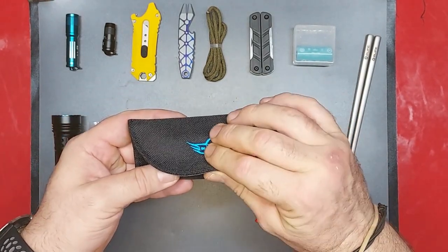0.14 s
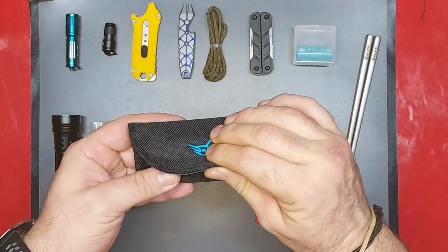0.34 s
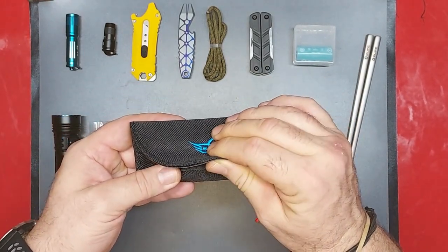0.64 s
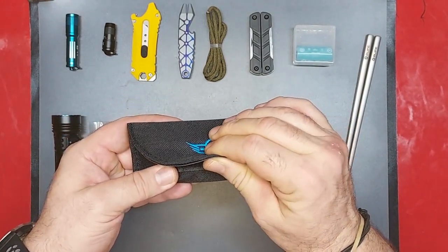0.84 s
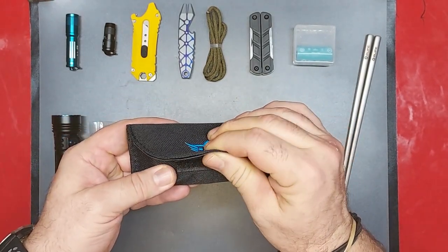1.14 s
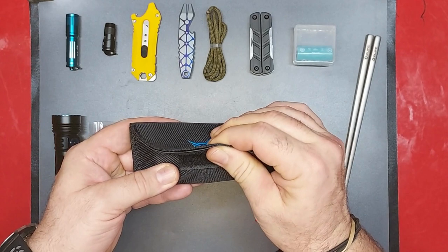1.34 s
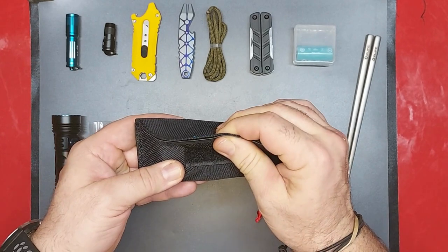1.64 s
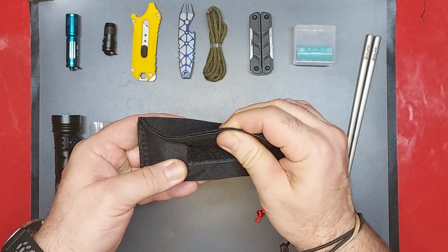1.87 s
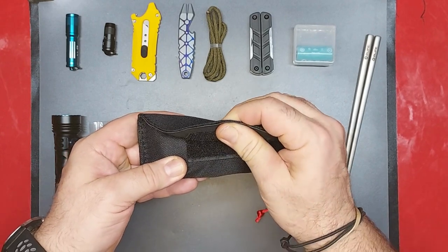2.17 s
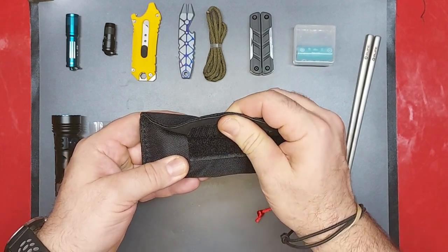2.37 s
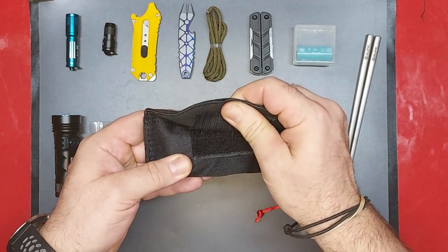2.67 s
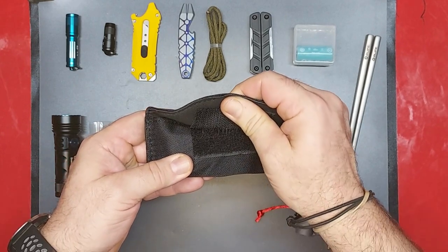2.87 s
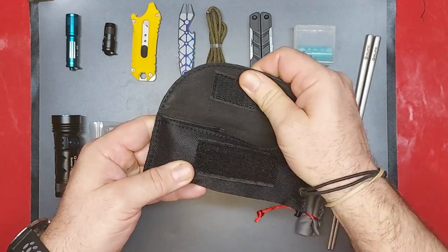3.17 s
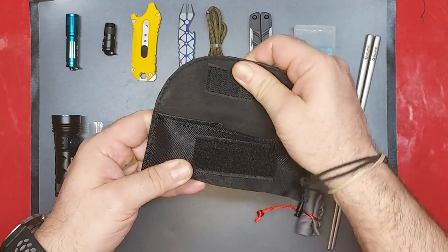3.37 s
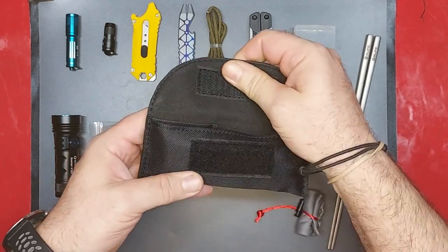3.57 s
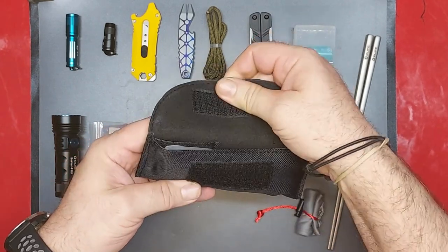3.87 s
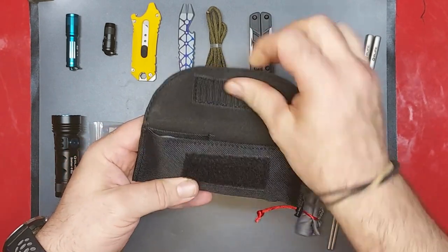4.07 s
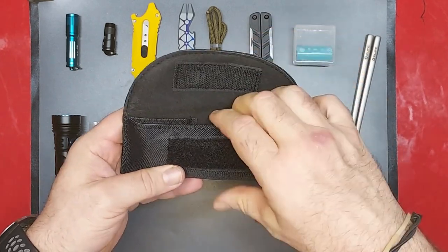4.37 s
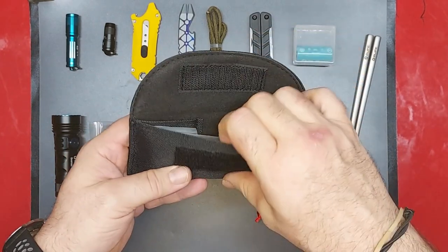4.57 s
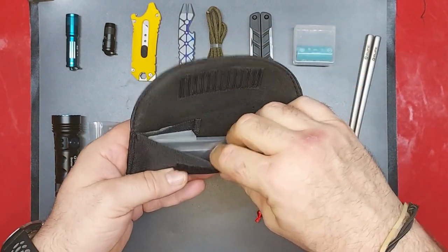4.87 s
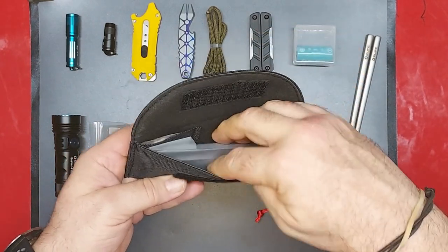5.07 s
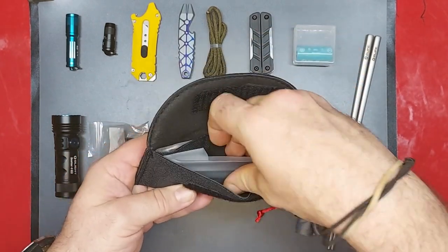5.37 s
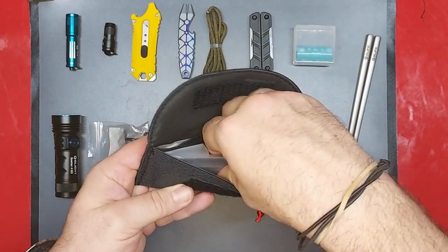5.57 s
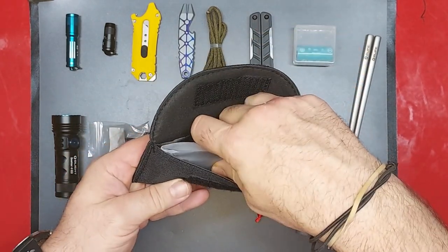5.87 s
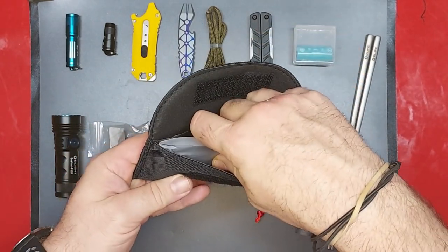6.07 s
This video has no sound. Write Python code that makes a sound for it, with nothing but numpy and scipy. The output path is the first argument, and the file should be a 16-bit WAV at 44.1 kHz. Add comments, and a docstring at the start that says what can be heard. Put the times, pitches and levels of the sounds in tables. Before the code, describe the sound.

A hook-and-loop pouch flap is peeled open slowly with crackling, ragged rips, then fingers rustle and scuff softly inside the nylon in a quiet room.

```python
"""Opening and searching a pouch

The hook-and-loop flap of a nylon pouch is peeled open over a workbench: clusters of clicks over running tears.
Then fingers slide over the cloth and push inside, with fine ticks, a dull scuff and soft squeaks.
Random clicks shake filters for fibres, flap, pouch and hollow; echoes of bench and small room, then faint air."""
import sys
import numpy as np
from scipy import signal
from scipy.fft import rfft, irfft
from scipy.io import wavfile
from scipy.ndimage import uniform_filter1d

SR = 44100
rng = np.random.default_rng(int(sys.argv[2]) if len(sys.argv) > 2 else 0)


def materialize(psi):
    """Save the field psi as 16-bit PCM at rate SR to the path in sys.argv[1].

    A 1-D psi becomes a single channel; in a 2-D psi each row is a channel.
    """
    bounded = np.clip(np.atleast_2d(psi).T, -1, 1)
    quanta = np.round(bounded * 32767).astype(np.int16)
    wavfile.write(sys.argv[1], SR, quanta)


N = 274733

# All table levels are relative: the functions below mix and filter the parts.
# "give" is the flap's answer relative to the snap: small while the cloth is taut, larger as it loosens.
# the loudest clusters of hooks letting go: (t/s, snap level/dB, give/dB, ring of the cloth f/Hz)
HOOK_CLUSTERS = [(.211, -42, -12, 2000), (.2295, -37.5, -7, 4120), (.2452, -41, 2.5, 3000),
                 (.3408, -31.5, -10, 4300), (.3501, -42, -13, 4060), (.4095, -34, -7.5, 4500),
                 (.4869, -38, -22, 4500), (.6465, -46, -19, 2900), (.7517, -32, -16, 4320),
                 (.7802, -32, -5.5, 3150), (.8243, -29, -8, 1490), (.8553, -31, -16, 1350),
                 (.8735, -24, -13, 4170), (.881, -29.5, -6.5, 1350), (.9118, -23, -11.5, 3380),
                 (.9539, -34.5, -13.5, 1660), (1.037, -37, -21, 3500), (1.0415, -19.5, -16.5, 3700),
                 (1.1154, -35, -19, 4500), (1.1528, -27.5, -19, 4030), (1.189, -29.5, -4.5, 1700),
                 (1.2191, -26.5, -11, 4100), (1.229, -21.5, -15, 1200), (1.2414, -22, -9, 1870),
                 (1.2637, -22.5, -6, 4050), (1.301, -19.5, -12.5, 3060), (1.3161, -32, -0.5, 1670),
                 (1.3365, -29, -1.5, 1840), (1.348, -20, -12.5, 3500), (1.3572, -34.5, -6, 1830),
                 (1.3877, -34.5, -7, 1640), (1.4198, -29.5, -13, 2960), (1.4326, -28.5, -2.5, 3050),
                 (1.4725, -23.5, -15, 4330), (1.481, -17.5, -10.5, 4530), (1.4986, -21, -12, 1680),
                 (1.5311, -24.5, -10, 1623), (1.5404, -24, -8.5, 2840), (1.5825, -21, -17, 2070),
                 (1.5937, -23, -3.5, 2200), (1.602, -16, -24, 1660), (1.6449, -25.5, -12.5, 1650),
                 (1.6643, -23.5, -17, 1700), (1.709, -25.5, -17, 4370), (1.7664, -35, -16.5, 4180),
                 (1.7844, -27.5, -8, 2970), (1.7957, -27, -8.5, 3030), (1.8383, -23, -11, 1730),
                 (1.8854, -21, -14, 2900), (1.921, -22, -12, 1800), (1.9458, -31, -7.5, 3060),
                 (2.0219, -29.5, -22.5, 4180), (2.0844, -32.5, -18.5, 3330), (2.1422, -29, -15.5, 3440),
                 (2.1471, -15.5, -17, 3530), (2.1772, -28.5, -10.5, 1970), (2.2166, -24.5, -13, 1960),
                 (2.2427, -20.5, -15.5, 3150), (2.284, -21, -7.5, 1880), (2.2907, -12.5, -9.5, 3580),
                 (2.3181, -23, -9, 1800), (2.4567, -24, 0, 2070), (2.5062, -21, -5.5, 1970),
                 (2.6101, -41, -5, 1970), (2.6327, -32, -11.5, 1950), (2.644, -30.5, -7, 2070),
                 (2.6887, -17.5, -12, 1250), (2.7154, -20.5, -4, 1860), (2.757, -25, -3.5, 2060),
                 (2.817, -34, -7.5, 2000), (2.8426, -36.5, -4, 1940), (2.8512, -26.5, -15.5, 1900),
                 (2.8726, -31.5, -10.5, 4300), (2.9002, -31.5, -7, 1940), (2.9414, -36, -7, 3580),
                 (2.9557, -28, -11.5, 1750), (3.03, -34.5, 4, 1300), (3.0494, -29.5, 7, 2050),
                 (3.0636, -19.5, -3, 2030), (3.0884, -30.5, 11.5, 1970)]
# pulls that keep the strip tearing: (start t/s, length t/s, snap level/dB, swell start to end/dB, give/dB)
TEARING_PULLS = [(.78, 0.22, -52.5, -12.5, -4.5), (1.21, 0.16, -36.5, -8, -10),
                 (1.478, 0.14, -37, 0.5, -13.5), (1.79, 0.12, -37, -1, -6.5),
                 (2.203, 0.056, -31.5, -4, -7.5), (2.283, .06, -26, -6, -5), (2.35, .06, -32, 0.5, -3.5),
                 (2.415, 0.018, -23.5, 4, -9), (2.44, 0.064, -22.5, -4.5, -5),
                 (2.515, 0.015, -32.5, -11, -8.5), (2.64, 0.062, -37.5, 14, -3),
                 (2.688, 0.093, -29.5, -5.5, -5), (2.83, 0.065, -50.5, 2, -6), (2.995, 0.03, -27, 4, -2.5),
                 (3.024, .08, -27, -2, -1.5)]
# creases and seams flicking past the fingers: (t/s, snap level/dB, give/dB, ring of the cloth f/Hz)
CREASE_FLICKS = [(.0445, -56, -2.5, 1700), (.118, -48.5, -5.5, 3000), (.1375, -45, -11.5, 4000),
                 (3.7897, -44, -16.5, 1940), (4.0527, -41, -32, 4380), (4.155, -38, -19, 3630),
                 (4.5837, -56.5, 2.5, 1970), (4.7213, -41, -8.5, 3500), (4.7357, -44.5, 3.5, 3300),
                 (4.8296, -48.5, -4, 1790), (4.9699, -43, 1, 1940), (5.0758, -43.5, 0.5, 1960),
                 (5.2755, -40.5, -9.5, 1900), (5.7743, -43.5, -25, 2520), (6.1917, -48, -3.5, 3900)]
# strokes of the fingers over the cloth: (start t/s, length t/s, hiss level/dB, swell start to end/dB, give/dB)
FINGER_STROKES = [(.02, 0.15, -61.5, 7, -4), (.24, .06, -55, -4, -10), (.49, .21, -66, -7, -8.5),
                  (3.375, 0.025, -66, -5, -10), (3.42, .04, -70, 5, -13), (3.47, 0.16, -62, -10.5, -11.5),
                  (3.7, .025, -58.5, -9, -11.5), (3.93, 0.15, -57, 6, -9.5),
                  (4.057, 0.028, -49, -4.5, -12.5), (4.1, 0.042, -57.5, 0.5, -9),
                  (4.3, 0.057, -62, 2.5, -3), (4.43, 0.19, -65, -3.5, -6), (4.57, 0.3, -58.5, 5, -4),
                  (4.9, 0.097, -55, 5, 1), (5.02, 0.11, -57, -2, -3.5), (5.17, 0.084, -61, 2.5, 3),
                  (5.26, 0.14, -59.5, -9, -2), (5.37, 0.13, -60, -3, -7.5), (5.48, 0.045, -53, 4, -1),
                  (5.67, .13, -62, 7, -5.5), (5.82, 0.14, -57.5, -7, 0.5), (6.2, .03, -64, -1, 3)]
# how freely the whole pouch moves with the flap: (t/s, pouch minus flap level/dB)
POUCH_SLACK = [(0, -10), (1.0, -22.5), (2.0, -13), (2.8, -11), (3.101, -7), (4.1, -9.5), (4.7, -26),
               (5.2, -14), (6.2, -42)]
# colour of the bright hook clicks: (f/Hz, level/dB)
HOOK_COLOUR = [(1500, -41.5), (3000, -4.5), (4000, -7.5), (5500, -3), (7000, -6), (8500, -10),
               (10500, -3.5), (12500, -2), (16000, -5)]
# colour of the flap, in the middle range: (f/Hz, level/dB)
FLAP_COLOUR = [(400, -41), (800, -1.5), (1150, 0.5), (1800, 6), (2300, 5), (3000, 5), (4000, 4.5),
               (6000, -26.5), (12000, -47.5)]
# colour of the pouch body, below the flap: (f/Hz, level/dB)
POUCH_COLOUR = [(60, -23), (150, -14), (280, -7.5), (380, -1), (650, 2.5), (900, 2), (1400, -17.5),
                (4000, -44)]
# resonances of the bench and the things on it: (f/Hz, width f/Hz, level/dB)
BENCH_MODES = [(644, 59, 1), (745, 54, -1.5), (885, 39, 4), (1044, 110, -4), (1148, 86, 5.5),
               (1310, 140, 4), (1477, 120, -4.5), (1660, 100, 4), (1926, 130, 5.5), (2044, 61, -8.5),
               (2460, 84, 3.5), (3503, 150, 3.5)]
# hollow between finger and wall: (f/Hz, width f/Hz, level/dB)
HOLLOW_MODES = [(397, 58, -5), (577, 150, 1)]
# fingertips squeaking softly over the lining: (middle t/s, fade time t/s, level/dB, centre f/Hz)
LINING_RUBS = [(4.344, 0.046, -68, 1240), (4.963, 0.16, -63.5, 1390), (5.26, 0.078, -66.5, 940),
               (5.866, 0.085, -69, 1060)]
# stereo width: (f/Hz, side minus mid level/dB)
STEREO_WIDTH = [(100, -9.5), (350, -8.5), (1000, -5.5), (2000, -5), (3500, -2.5), (5500, 2), (7500, -4),
                (11000, -15), (16000, -12.5)]
# stereo balance: (f/Hz, left minus right level/dB)
STEREO_LEAN = [(60, 5.5), (250, -1.5), (500, -1), (1000, -2.5), (2000, -0.5), (5500, 3), (8500, -2),
               (13000, 0.4)]
# stereo timing: (f/Hz, phase by which the left port leads/rad)
STEREO_LEAD = [(100, 0), (800, -0.4), (1700, -.15), (2500, -0.54), (5000, -0.69), (7500, -0.13)]
# colour of the room air: (f/Hz, level/dB)
AIR_COLOUR = [(15, -31), (25, 3), (80, 6.5), (439, -12.5), (607, -14), (1040, -23), (1890, -16),
              (2110, -19), (2480, -20.5), (5730, -21), (8590, -21), (13600, -27.5), (16000, -17.5)]

AIR_DB = -69.5
TOP_HZ = 15900
PULL_ATTACK_S, PULL_RELEASE_S = 0.012, 0.0082
STROKE_ATTACK_S, STROKE_RELEASE_S = 0.023, 0.033
# hooks part faster under a harder pull: rate at a reference level, and dB of level per doubling of the rate
HOOKS_PER_S, HOOKS_AT_DB, DOUBLING_DB = 1500, -27.5, 7
# a finger dragging down the inner wall: moment of greatest pressure, its level, and the rise and fall around it
DRAG_S, DRAG_DB, DRAG_RISE_S, DRAG_FALL_S = 5.5, -44, 0.038, 0.031

# filter length and hop between changing echoes, both in samples
SIZE, HOP = 8192, 2048
FREQS = np.maximum(np.arange(SIZE // 2 + 1) * SR / SIZE, 1)
TIME = np.arange(N) / SR


def fastener(snap_db=-3, body_db=1.0, tear_db=-3):
    """Single clusters snap over running tears: stray hooks under a light pull, row after row under a hard one."""
    snaps = clusters(HOOK_CLUSTERS, lead=0.42, spread_s=0.0021, ring_width=290, ring_share=0.27, count=20)
    pull = gestures(TEARING_PULLS, PULL_ATTACK_S, PULL_RELEASE_S)
    pull_db = 20 * np.log10(pull[0] + 1e-9)
    rate = HOOKS_PER_S * 2 ** ((pull_db - HOOKS_AT_DB) / DOUBLING_DB)
    hooks = grains(per_second=rate, scatter_db=5.5, even_s=0.021)
    tears = pull * ragged(per_second=180, depth_db=1.5) * hooks
    return undb([[snap_db], [body_db]]) * snaps + undb(tear_db) * tears


def handling(slide_db=-3, crease_db=-3, body_db=2):
    """The weave ticks finely and unevenly under the skin, and a crease flicks now and then."""
    threads = grains(per_second=3000, scatter_db=3.5, even_s=0.03)
    ticks = ragged(per_second=65, depth_db=2.0) * threads
    weave = gestures(FINGER_STROKES, STROKE_ATTACK_S, STROKE_RELEASE_S) * ticks
    creases = clusters(CREASE_FLICKS, lead=0.67, spread_s=0.0019, ring_width=110, ring_share=0.073)
    return undb(slide_db) * weave + undb([[crease_db], [body_db]]) * creases


def pouch(snap, flap):
    """Fibres click brightly, the flap answers in the middle range and the slack pouch below it."""
    bench = bells(BENCH_MODES)
    body = flap * envelope(*np.transpose(POUCH_SLACK))
    parts = [(blurred(snap), HOOK_COLOUR), (flap, FLAP_COLOUR), (body, POUCH_COLOUR)]
    return sum(through(drive, unit(response(colour(points) + bench))) for drive, points in parts)


def finger_drag(scuff_db=-13, scuff_hz=1400, scuff_width=1100, cut_hz=270):
    """Skin sticks and slips on the lining, scuffs the cloth and rings the hollow inside the pouch."""
    hollow = sum(undb(db) * soft_ring(hz, width) for hz, width, db in HOLLOW_MODES)
    scuff = soft_ring(scuff_hz, scuff_width)
    side_s = np.where(TIME < DRAG_S, DRAG_RISE_S, DRAG_FALL_S)
    pressure = np.exp(-((TIME - DRAG_S) / side_s) ** 2)
    slips = undb(DRAG_DB) * pressure * grains(per_second=890, scatter_db=0.5, even_s=0.015)
    # the small hollow radiates no deep bass
    low_cut = signal.butter(2, cut_hz, "high", fs=SR, output="sos")
    return signal.sosfilt(low_cut, through(slips, unit(hollow) + undb(scuff_db) * scuff))


def rubs(width=260):
    """Quick stick and slip swells and fades in one narrow ring of the cloth."""
    slips = grains(per_second=900, scatter_db=14, even_s=0.09)
    total = np.zeros(N)
    for middle, fade_s, db, hz in LINING_RUBS:
        swell = np.exp(-((TIME - middle) / fade_s) ** 2)
        total += undb(db) * through(slips * swell, ring(hz, width))
    return total


def clusters(table, lead, spread_s, ring_width, ring_share, scatter_db=6, count=14):
    """One fibre lets go and its neighbours follow within milliseconds; gives the snap and flap drives."""
    drive = np.zeros((2, N + 2 * HOP))
    delays = rng.exponential(spread_s, (len(table), count))
    signs = rng.choice([-1, 1], delays.shape)
    sizes = undb(scatter_db * rng.standard_normal(delays.shape)) * signs
    # a longer cluster gets more energy, so its level does not thin out
    weight = np.sqrt((spread_s + 0.001) * SR)
    for (start, db, give_db, hz), delay, size in zip(table, delays, sizes):
        places = np.minimum(np.append(0, delay) * SR, HOP - 1).astype(int)
        pulses = np.bincount(places, np.append(lead, unit(size)), HOP)
        # the patch of cloth that springs back rings briefly
        recoil = pulses + ring_share * through(pulses, ring(hz, ring_width, size=512))
        pair = np.array([unit(pulses), undb(give_db) * unit(recoil)])
        i = int(start * SR)
        drive[:, i:i + HOP] += weight * undb(db) * pair
    return drive[:, :N]


def gestures(table, attack_s, release_s):
    """Each move of the hand sets in, swells or eases while it lasts, and dies away; gives snap and flap gains."""
    gains = np.zeros((2, N))
    for start, length, db, swell_db, give_db in table:
        along = np.clip((TIME - start) / length, 0, 1)
        attack = np.clip((TIME - start) / attack_s + 0.5, 0, 1)
        release = np.exp(-np.maximum(TIME - start - length, 0) / release_s)
        gain = attack * release * undb(db + swell_db * (along - 0.5))
        gains = np.maximum(gains, [gain, gain * undb(give_db)])
    return gains


def grains(per_second, scatter_db, even_s):
    """Random clicks of unequal size, their power held near one over stretches of even_s."""
    chosen = rng.random(N) < per_second / SR
    clicks = chosen * rng.choice([-1, 1], N) * undb(scatter_db * rng.standard_normal(N))
    power = uniform_filter1d(clicks ** 2, int(even_s * SR) + 1)
    return clicks / np.sqrt(np.abs(power) + 1e-6)


def ragged(per_second, depth_db):
    """A gain that jumps to a new random value many times a second."""
    return undb(depth_db * rng.standard_normal(N)[(TIME * per_second).astype(int)])


def blurred(clicks, share=0.36, length_s=0.0013):
    """Each click is mixed with a brief fading burst of noise, which blurs it slightly."""
    fade = unit(np.exp(-TIME[:HOP] / length_s)) ** 2
    fuzz = np.sqrt(np.abs(through(clicks ** 2, fade))) * rng.standard_normal(N)
    return np.sqrt(1 - share) * clicks + np.sqrt(share) * fuzz


def ring(hz, width, size=SIZE):
    """A struck resonance with an energy of one; the wider it is, the sooner it dies away."""
    return unit(np.exp(-np.pi * width * TIME[:size]) * np.sin(2 * np.pi * hz * TIME[:size]))


def soft_ring(hz, width):
    """A ring passed through itself, so that it builds up before it dies away."""
    return unit(through(ring(hz, width), ring(hz, width)))


def reflections(x, direct, early_t60=0.041, late_t60=0.16, late_db=-6, evenness=0.71):
    """Direct sound, quick bench scatter and a short room tail; the paths keep changing as the hands move."""
    count = N // HOP + 2
    padded = np.pad(x, (HOP, 2 * HOP))
    pieces = np.lib.stride_tricks.sliding_window_view(padded, 2 * HOP)[::HOP][:count]
    # t60 is the time in seconds to fall by 60 dB
    early, late = (unit(np.exp(-np.log(1000) * TIME[:SIZE] / t60)) for t60 in (early_t60, late_t60))
    decay = np.hypot(early, undb(late_db) * late)
    # a new random set of echoes for every piece
    paths = decay * rng.standard_normal((count, SIZE))
    paths[:, 0] += direct
    spectra = rfft(paths / np.sqrt(direct ** 2 + np.sum(decay ** 2)))
    # partly smooth the peaks and notches of each random echo set
    ripple = irfft(np.log(uniform_filter1d(np.abs(spectra) ** 2, size=25)))
    ripple[:, 0] /= 2
    ripple[:, SIZE // 2:] = 0
    paths = irfft(spectra * np.exp(-evenness * rfft(ripple)))
    # overlapping pieces fade into each other
    faded = pieces * signal.windows.hann(2 * HOP, sym=False)
    echoes = signal.fftconvolve(faded, paths, axes=1)
    out = np.zeros(N + 4 * HOP + SIZE)
    for k, echo in enumerate(echoes):
        out[k * HOP:k * HOP + len(echo)] += echo
    return out[HOP:HOP + N]


def room(x):
    """Both ports share the direct sound, the right one slightly ahead; reflections set them apart."""
    mid = reflections(x, direct=0.51)
    side = through(reflections(x, direct=0), response(colour(STEREO_WIDTH)))
    # half of the left-right difference goes to each port
    port = np.sqrt(undb(colour(STEREO_LEAN)) * np.exp(1j * colour(STEREO_LEAD)))
    ears = []
    for sound, gain in [(mid + side, port), (mid - side, 1 / port)]:
        centred = np.roll(irfft(gain), SIZE // 2 - 1)
        ears.append(signal.fftconvolve(sound, centred, "same"))
    return np.array(ears)


def air(side_db=-4):
    """Faint steady rumble and hiss of the room, made of filtered noise."""
    mid, side = (through(rng.standard_normal(N), unit(response(colour(AIR_COLOUR)))) for _ in range(2))
    return undb(AIR_DB) * (mid + undb(side_db) * np.array([side, -side]))


def undb(db):
    """Decibels to gain."""
    return 10 ** (np.asarray(db) / 20)


def unit(x):
    """Scale to an energy of one."""
    return x / np.sqrt(np.sum(x ** 2))


def envelope(times, db):
    """Gain along a level curve, silent outside it."""
    return np.interp(TIME, times, undb(db), left=0, right=0)


def colour(points):
    """Curve through (f/Hz, value) points joined on a log-frequency axis."""
    hz, values = np.transpose(points)
    return np.interp(np.log(FREQS), np.log(hz), values)


def bells(modes):
    """The dB curve of a set of (f/Hz, width f/Hz, level/dB) resonances."""
    return sum(db / (1 + (2 * (FREQS - hz) / width) ** 2) for hz, width, db in modes)


def response(db):
    """Impulse response with the given dB curve that starts at once, with no sound ahead of the click."""
    cepstrum = irfft(np.log(undb(db)))
    # folding the second half onto the first gives minimum phase
    cepstrum[1:SIZE // 2] *= 2
    cepstrum[SIZE // 2 + 1:] = 0
    return irfft(np.exp(rfft(cepstrum)))


def through(x, ir):
    """Pass a sound through an impulse response."""
    return signal.fftconvolve(x, ir)[:len(x)]


def scene():
    """The pouch is opened and searched in the quiet room."""
    snap, flap = fastener() + handling()
    close_sound = pouch(snap, flap) + finger_drag() + rubs()
    return room(close_sound) + air()


def record(dry):
    """The recorder cuts the top with a steep low-pass filter."""
    return signal.sosfilt(signal.ellip(10, 0.2, 70, TOP_HZ, fs=SR, output="sos"), dry)


dry = scene()
out = record(dry)
materialize(out)
```